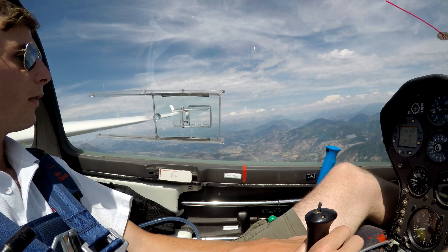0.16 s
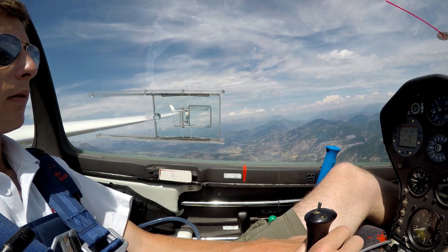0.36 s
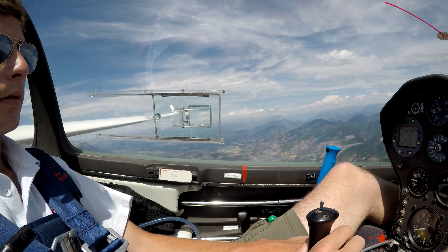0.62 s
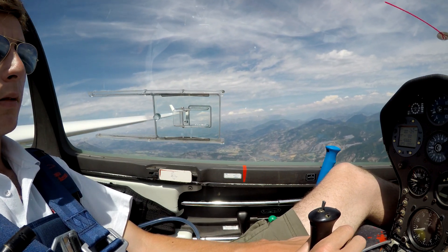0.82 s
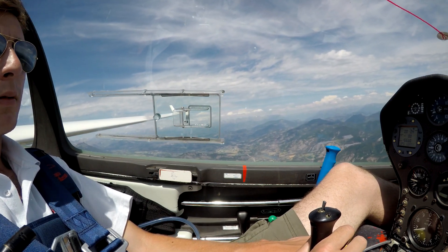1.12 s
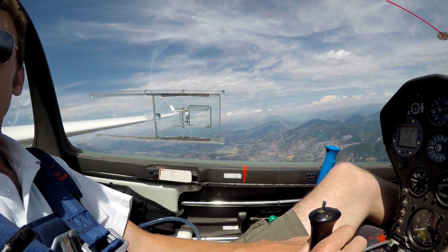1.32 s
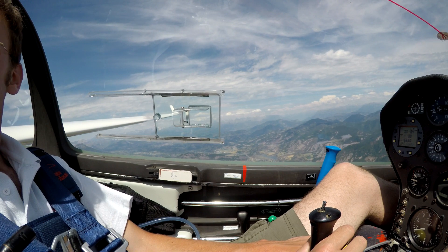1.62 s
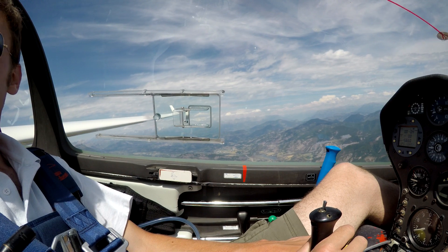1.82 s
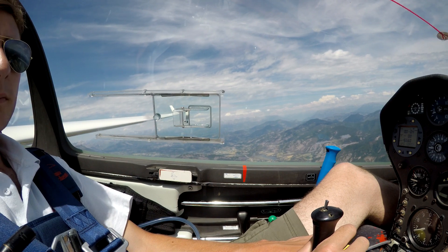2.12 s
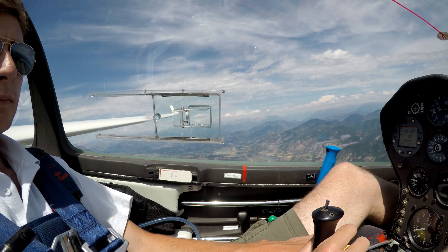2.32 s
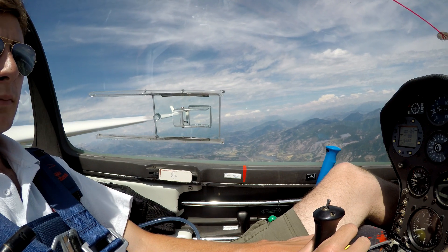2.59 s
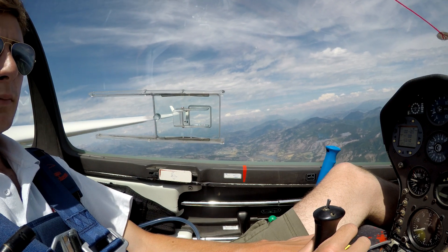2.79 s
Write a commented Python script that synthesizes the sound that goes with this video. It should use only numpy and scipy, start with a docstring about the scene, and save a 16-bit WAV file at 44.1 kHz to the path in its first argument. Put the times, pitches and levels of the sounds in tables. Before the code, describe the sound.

Steady rush of wind with a low buffeting rumble inside a glider cockpit in flight.

```python
"""A low, buffeting rumble and a steady rush of air fill the closed cockpit of a glider in flight.
Turbulent flow over the canopy excites the resonances of the cabin and hisses through the vent and seals.
Now and then the airframe gives a soft, dull knock that dies away in the damped modes of the hull.
Gusts draw short, hollow booms from the shell, and cloth rustles faintly."""
import sys
import numpy as np
from scipy import signal
from scipy.fft import rfft, irfft
from scipy.io import wavfile
from scipy.ndimage import uniform_filter1d

SR = 44100
rng = np.random.default_rng(int(sys.argv[2]) if len(sys.argv) > 2 else 0)


def output_pcm(signal):
    """Save a mono or channel-first signal as 16-bit PCM at the path in sys.argv[1].

    Samples are clipped to [-1, 1] before scaling.
    """
    pcm = np.clip(np.atleast_2d(signal).T, -1, 1) * 32767
    wavfile.write(sys.argv[1], SR, np.round(pcm).astype(np.int16))


N = 130095
TIME = np.arange(N) / SR
BIN_HZ = np.arange(N // 2 + 1) * SR / N


def from_db(db):
    """Amplitude grows tenfold for every 20 dB."""
    return 10 ** (np.asarray(db) / 20)


def unit_rms(x):
    """Normalisation to a mean power of 1."""
    return x / np.sqrt(np.mean(x ** 2) + 1e-20)


def coloured_noise(spectrum):
    """Spectral shaping: white noise takes on the given colour, at an rms of 1."""
    hz, db = np.transpose(spectrum)
    gain = from_db(np.interp(np.log(np.maximum(BIN_HZ, 1)), np.log(hz), db))
    return unit_rms(irfft(rfft(rng.standard_normal(N)) * gain, N))


def drift(corner_hz):
    """Low-pass filtering turns noise into a smooth random fluctuation with an rms of 1."""
    return unit_rms(irfft(rfft(rng.standard_normal(N)) / (1 + (BIN_HZ / corner_hz) ** 2), N))


def blown_resonances(resonances):
    """Forced vibration: each resonator, driven by turbulence of its own, sounds a narrow band of noise."""
    total = np.zeros(N)
    for hz, width, db in resonances:
        radius = np.exp(-np.pi * width / SR)
        feedback = [1, -2 * radius * np.cos(2 * np.pi * hz / SR), radius ** 2]
        tone = signal.lfilter([1, 0, -1], feedback, rng.standard_normal(N + SR))
        octave_band = signal.butter(2, [hz / np.sqrt(2), hz * np.sqrt(2)], "band", fs=SR, output="sos")
        steady_tone = signal.sosfilt(octave_band, tone)[SR:]   # one second to reach steady state
        total += from_db(db) * unit_rms(steady_tone)
    return total


def hull_rumble():
    """Buffeting: unsteady pressure on the hull makes low noise that swells and sinks."""
    # Each row: time in seconds, level of the rumble in dB.
    buffeting = [(0, -25.5), (.13, -22), (.18, -31), (.23, -27.5), (.29, -45), (.46, -18.5), (.53, -29),
                 (.58, -22.5), (.98, -28.5), (1.02, -24), (1.27, -24), (1.31, -19), (1.43, -27),
                 (1.49, -21.5), (1.54, -27), (1.88, -21), (1.93, -24), (2.0, -18), (2.07, -31), (2.3, -18),
                 (2.35, -26), (2.45, -30), (2.5, -20), (2.61, -21.5), (2.65, -25.5), (2.88, -25),
                 (2.95, -39)]
    # Each row: frequency in Hz, relative spectral density of the rumble in dB.
    spectrum = [(8, -41), (16, -7.5), (28, 5), (46, 0), (68, -4), (82, -17.5), (120, -49), (300, -71),
                (2000, -130)]
    noise = coloured_noise(spectrum)
    local_power = uniform_filter1d(uniform_filter1d(noise ** 2, size=1800), size=1800)
    even_noise = noise / np.sqrt(local_power + 1e-9)
    return even_noise * from_db(np.interp(TIME, *np.transpose(buffeting)))


def canopy_rush(turbulence, flutter_db=0.44):
    """Broadband excitation: flow over the canopy roars and drives the modes of cabin air and shell."""
    # Each row: frequency in Hz, relative spectral density of the rush in dB.
    spectrum = [(40, -3.5), (90, 0), (150, -2), (215, -9), (310, -4.5), (390, -9), (490, -9.5), (560, -20),
                (640, -9), (760, -14.5), (900, -17), (1080, -16), (1450, -23.5), (1800, -26.5), (2600, -34),
                (4000, -31.5), (9000, -63)]
    # Each row: frequency of a cabin mode in Hz, bandwidth in Hz, rms level in dB before swell and flutter.
    cabin_modes = [(125.8, 13.5, -41), (168, 16.7, -39), (263, 23, -39), (419, 12, -54), (512, 12.5, -49),
                   (675.4, 53, -42.5), (878, 23, -48.5), (935.6, 15, -46.5), (1116, 30, -62),
                   (1244, 23, -51), (1359, 47, -55), (1575, 67, -53), (2157, 70, -55)]
    # Each row: time in seconds, gain of the slow swell in dB.
    swell = [(0, 1.1), (.6, 0.27), (1.3, 1), (2.1, -0.35), (2.45, 0.5), (2.8, 1.1)]
    rush = from_db(-30) * coloured_noise(spectrum) + blown_resonances(cabin_modes)
    gain_db = np.interp(TIME, *np.transpose(swell)) + flutter_db * turbulence
    return rush * from_db(gain_db)


def vent_hiss(turbulence, flutter_db=0.35, waver_db=1.8):
    """Flow noise: air hisses through vent and seals, and the vent gap resonates in a breathy whistle."""
    # Each row: frequency in Hz, relative spectral density of the hiss in dB.
    spectrum = [(900, -10), (2000, -5), (3350, -7.5), (3750, -0.8), (4500, -1.5), (5500, -4.5), (6100, -6),
                (6800, -16), (7650, -22.5), (8700, -16.5), (10200, -20.5), (11600, -27.5), (13300, -27),
                (15000, -36)]
    # Each row: frequency of a gap resonance in Hz, bandwidth in Hz, rms level in dB before modulation.
    gap_modes = [(2946, 89, -57.5), (3568, 36, -50.5), (3745, 98, -51), (3956, 74, -52.5), (5810, 150, -55),
                 (6070, 31, -60.5), (6050, 170, -64), (8200, 120, -73.5)]
    # Each row: time in seconds, gain in dB as the flow through the vent slowly swells.
    swell = [(0, -0.5), (.6, 0.85), (1.2, -0.5), (1.7, 0.15), (2.15, -0.5), (2.55, 0), (2.95, 0)]
    hiss = from_db(-41.5) * coloured_noise(spectrum)
    whistle = blown_resonances(gap_modes) * from_db(waver_db * drift(corner_hz=6))
    gain_db = np.interp(TIME, *np.transpose(swell)) + flutter_db * turbulence
    return (hiss + whistle) * from_db(gain_db)


def damped_mode(force, hz, t60):
    """Damped oscillator: an impulse starts a sine that falls by 60 dB in t60 seconds."""
    radius = np.exp(-np.log(1000) / (t60 * SR))
    angle = 2 * np.pi * hz / SR
    return signal.lfilter([0, np.sin(angle)], [1, -2 * radius * np.cos(angle), radius ** 2], force + 1e-18)


def airframe_knocks():
    """Impact excitation: contact, rebound and chatter ring the hull's modes, with a thud and a tick."""
    # Each row: start of a knock in seconds, then gains in dB of its force, low thud and bright tick.
    knocks = [(.278, -14, -18, -40), (.367, -15, -19, -35), (.621, -13, -15.5, -32.5),
              (1.067, -24, -26, -43), (1.183, -23, -17.5, -46), (1.290, -21.5, -27, -48),
              (1.351, -23, -30, -50), (1.698, -18, -12.5, -46), (1.852, -22.5, -26, -43),
              (2.448, -16.5, -16.5, -34.5), (2.552, -24, -17, -45), (2.665, -20.5, -18, -42)]
    # Each row: frequency of a hull mode in Hz, gain in dB, time to decay by 60 dB in seconds.
    hull_modes = [(300, -9, .04), (440, -9, .03), (700, -4, .026), (815, 0, .026), (945, -2.5, .022),
                  (1240, -17, .02), (2300, -21, .012)]
    # Each row: frequency in Hz, relative spectral density of the tick in dB.
    tick_spectrum = [(600, -25), (1500, 2), (3000, -4), (6000, -9), (7500, -19), (14000, -50)]
    contact_s, chatter_decay_s, tick_decay_s = 0.00026, 0.006, 0.009
    rebound_db, chatter_db = -5, -8
    thud_lag_s = 0.00708   # the shell flexes just after the contact
    force, flex, tick_envelope = np.zeros((3, N))
    for start, force_db, thud_db, tick_db in knocks:
        age, begun = np.maximum(TIME - start, 0), TIME >= start
        contact = age * np.exp(-2 * age / contact_s)
        contact /= contact.sum()
        rebound_lag_s = 0.00709 * rng.uniform(0.716, 1.288)
        rebound = from_db(rebound_db) * np.roll(contact, int(rebound_lag_s * SR))
        chatter = begun * np.exp(-age / chatter_decay_s) * rng.standard_normal(N)
        chatter *= from_db(chatter_db) / np.sqrt(np.sum(chatter ** 2))
        force += from_db(force_db) * (contact + rebound + chatter)
        flex[int((start + thud_lag_s) * SR)] += from_db(thud_db)
        tick_envelope += from_db(tick_db) * begun * np.exp(-age / tick_decay_s)
    ringing = sum((-1) ** k * from_db(db) * damped_mode(force, hz, t60)   # modes alternate in sign
                  for k, (hz, db, t60) in enumerate(hull_modes))
    thud = damped_mode(flex, hz=230, t60=0.034)
    soft_contact = signal.butter(2, 3500, fs=SR, output="sos")   # a soft contact passes little treble
    ticks = tick_envelope * coloured_noise(tick_spectrum)
    return signal.sosfilt(soft_contact, ringing + thud) + ticks


def bursts(crests):
    """Gaussian envelopes: the gain rises and falls in a bell shape around each crest."""
    return sum(from_db(db) * np.exp(-2 * ((TIME - crest) / width) ** 2) for crest, width, db in crests)


def gust_booms():
    """Forced response: gusts press on the shell, which answers with a short, hollow boom."""
    # Each row: time of a gust's crest in seconds, width in seconds, level at the crest in dB.
    gusts = [(.578, .05, -32.5), (1.03, 0.12, -29.5), (1.69, 0.084, -26), (2.17, 0.092, -28.5),
             (2.413, 0.018, -25)]
    # Each row: frequency in Hz, relative spectral density of the boom in dB.
    spectrum = [(60, -37), (120, 6.5), (190, 2.5), (290, -3), (420, -17.5), (700, -13), (1100, -39),
                (3000, -59)]
    return bursts(gusts) * coloured_noise(spectrum)


def cloth_rustles(crinkle_db=3):
    """Friction noise: cloth brushes faintly, made crinkly by fast random amplitude modulation."""
    # Each row: time of a brush's crest in seconds, width in seconds, level at the crest in dB.
    brushes = [(.628, .025, -46), (.675, .04, -55), (.99, 0.014, -45), (2.68, 0.034, -45.5),
               (2.75, 0.047, -46), (2.84, 0.015, -52)]
    # Each row: frequency in Hz, relative spectral density of the rustle in dB.
    spectrum = [(1500, -20), (4000, 1), (6000, 7), (7500, -10.5), (10000, -14), (14000, -34)]
    crinkle = coloured_noise(spectrum) * from_db(crinkle_db * drift(corner_hz=140))
    return bursts(brushes) * unit_rms(crinkle)


def scene():
    """Superposition: all sources add at one point beside the pilot."""
    rumble = hull_rumble()
    turbulence = drift(corner_hz=27)   # rush and hiss flutter together
    airflow = canopy_rush(turbulence) + vent_hiss(turbulence)
    return (rumble + airflow + airframe_knocks() + gust_booms() + cloth_rustles())[None]


def record(dry):
    """Band limiting: a steep low-pass filter removes the highest treble."""
    cutoff_hz = 15100
    return signal.sosfilt(signal.ellip(12, .1, 80, cutoff_hz, fs=SR, output="sos"), dry)


dry = scene()
out = record(dry)
output_pcm(out)
```